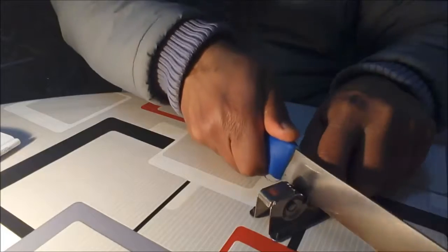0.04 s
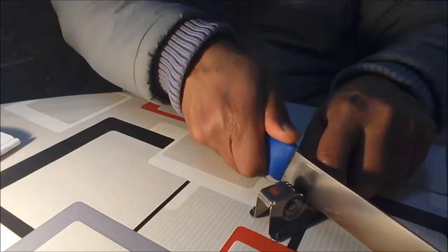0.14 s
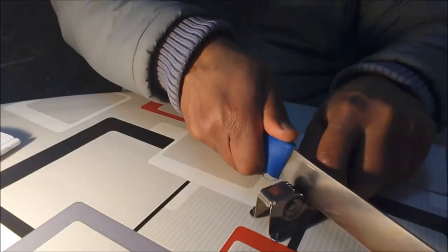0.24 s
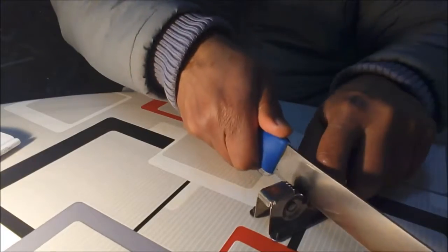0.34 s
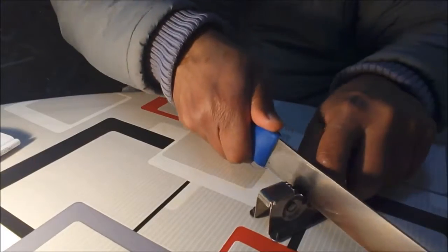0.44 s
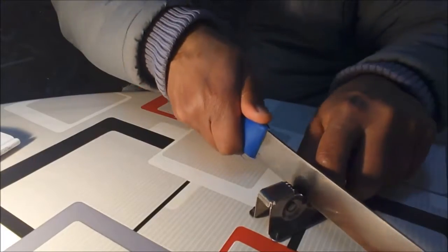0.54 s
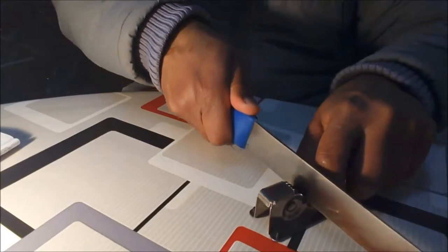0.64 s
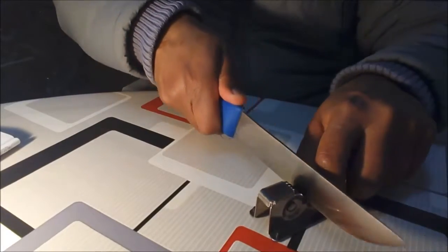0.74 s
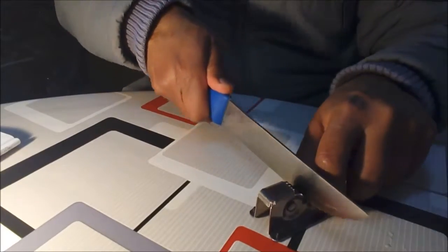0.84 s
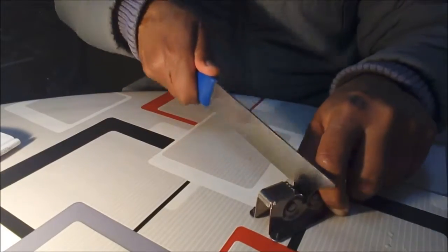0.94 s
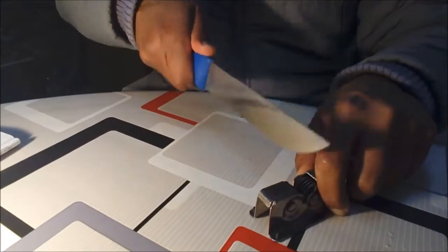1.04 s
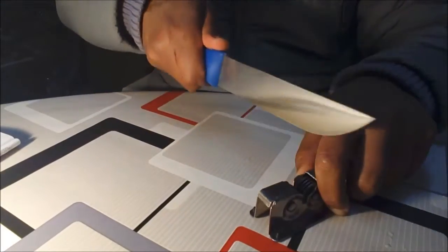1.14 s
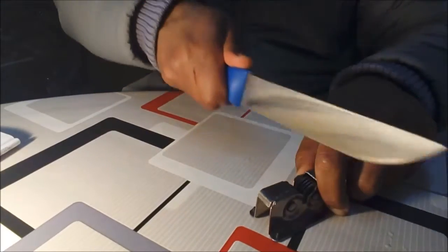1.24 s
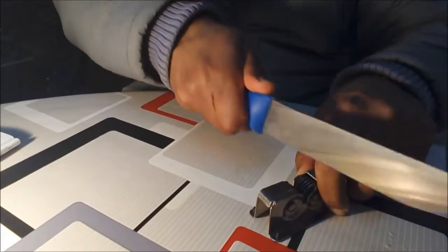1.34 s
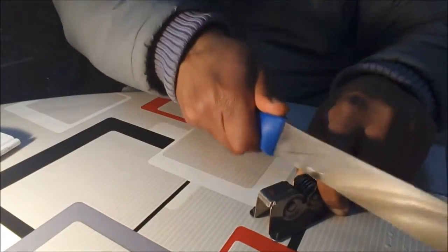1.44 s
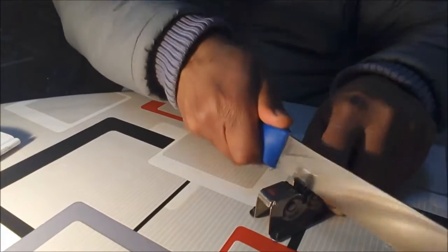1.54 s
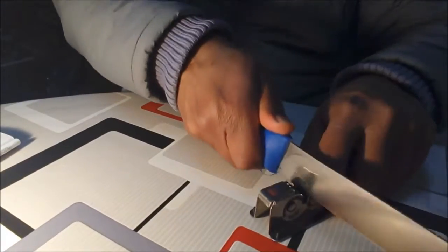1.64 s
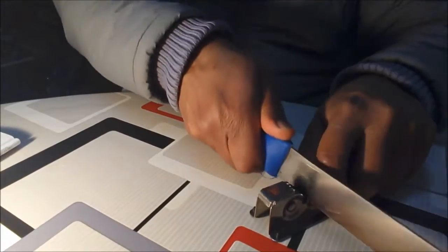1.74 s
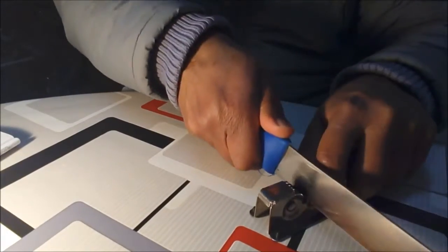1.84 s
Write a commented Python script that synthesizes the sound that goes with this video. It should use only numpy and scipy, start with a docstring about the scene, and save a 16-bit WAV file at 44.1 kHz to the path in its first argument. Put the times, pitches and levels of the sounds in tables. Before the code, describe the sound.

A kitchen knife is drawn once through a tabletop sharpener, heard close in a small room. Faint hiss until 0.2 s, then small metallic ticks and a dull thump near 0.3 s. From 0.42 s a gritty, bright steel scrape grows, the table juddering underneath, strongest around 0.7-1.05 s. Sharp clicks at 1.08-1.15 s as the tip jumps out; brief ringing fades into quiet hiss until about 1.9 s.

```python
"""A small room with a table, the camera microphone close to it: one pull of a kitchen knife through a
sharpener. Knocks thump the table top (sagging sines) and grit between the steels rings the blade (noise through
resonances). Judder shakes the table top (pulsing noise through low modes) and one blade mode sings and climbs.
The edge catches in rough bursts and ticks as it enters and as the tip jumps out (cracks and decaying sines).
The room rings on as a noise tail over a faint, steady, wide hiss."""
import sys
import numpy as np
from scipy import signal
from scipy.fft import rfft, irfft
from scipy.io import wavfile
from scipy.ndimage import uniform_filter1d

SR = 44100
rng = np.random.default_rng(int(sys.argv[2]) if len(sys.argv) > 2 else 0)


def unload_wav(signal):
    """Save mono or channel-first audio to the path in sys.argv[1] as 16-bit WAV at rate SR, clipped to [-1, 1]."""
    wavfile.write(
        sys.argv[1],
        SR,
        np.round(np.clip(np.atleast_2d(signal).T, -1, 1) * 32767).astype(np.int16),
    )


N = 83790
T = np.arange(N) / SR  # time of each sample [s]

# steady hiss of room and camera: (frequency [Hz], relative density [dB per Hz])
AIR_COLOUR = [(25, -3.5), (60, 1), (170, -6.5), (260, -17.5), (420, -12.5), (700, -10.5), (1200, -16),
              (2500, -18.5), (4000, -20), (6400, -22), (7600, -32), (10000, -35), (15400, -37)]
# stereo side of the hiss before narrowing: (frequency [Hz], side minus mid [dB])
HISS_SIDE = [(60, 0.5), (110, -7.5), (200, 8.5), (380, 2.5), (700, -4.5), (1290, -5.5), (2380, -4.5),
             (4400, -4.5), (8120, -4), (15000, -1)]
# low, middle and high groups of table-top modes, before the peaks are steepened:
# (frequency [Hz], width [Hz], relative level [dB])
TABLE_MODES = [
    [(137, 21, -8), (155.4, 16.8, 9), (169, 11, -4.5)],
    [(201.3, 53, -9), (247.8, 11.6, -1), (282.6, 26.5, -5)],
    [(336, 53, -0.5), (373.6, 6.9, -10), (406, 18, 1.5), (444, 200, -11)],
]
# deepest table modes, likewise: (frequency [Hz], width [Hz], relative level [dB])
DEEP_MODES = [(61.4, 130, -8.5), (107, 29, -0.5), (124, 71, -3)]
# rumble from judder and hands: (time [s], low modes [dB], middle modes [dB], high modes [dB])
RUMBLE_LEVELS = [(0, -78, -72.5, -75.5), (.21, -74, -74, -80.5), (0.227, -57, -44.5, -51.5),
                 (0.249, -60, -52, -52.5), (.29, -61, -52, -66), (0.324, -35.5, -44, -53),
                 (0.346, -38, -43.5, -78), (.38, -43.5, -57.5, -57), (0.426, -41, -57, -61.5),
                 (0.451, -45.5, -43.5, -51.5), (.51, -52.5, -46.5, -54.5), (.6, -51.5, -47.5, -52.5),
                 (.625, -52, -48.5, -54), (0.656, -32.5, -50, -55.5), (.682, -51, -46, -49),
                 (0.709, -36, -47, -47), (.756, -55, -44.5, -46), (.804, -42, -49.5, -42),
                 (.825, -46.5, -42.5, -48), (0.853, -39.5, -48, -40), (.878, -47.5, -41.5, -41.5),
                 (0.938, -40.5, -34, -41.5), (.965, -45, -48, -43.5), (0.989, -43, -48, -35),
                 (1.02, -49.5, -47, -46.5), (1.061, -51, -41, -42), (1.099, -48.5, -38, -38.5),
                 (1.149, -58, -44, -46.5), (1.2, -56, -53, -53.5), (1.246, -62.5, -50, -55),
                 (1.31, -75, -64, -60), (1.37, -63, -63, -75), (1.42, -63.5, -75.5, -77),
                 (1.57, -69.5, -69, -76), (1.607, -67, -79, -80), (1.625, -78, -75, -82),
                 (1.73, -84, -79, -76.5), (1.76, -65, -76, -78), (1.81, -67, -87, -83),
                 (1.85, -77, -74.5, -71), (1.9, -69, -71, -74.5)]
# deepest rumble: (time [s], level [dB])
DEEP_LEVELS = [(0.0, -79), (0.206, -80), (0.284, -62), (0.312, -38), (0.328, -37.5), (0.354, -57),
               (0.374, -50), (0.432, -42), (0.476, -52.5), (0.708, -51.5), (0.772, -56), (0.808, -45),
               (0.888, -73), (0.926, -67), (0.962, -69), (1.116, -60), (1.238, -80), (1.27, -64),
               (1.306, -71), (1.418, -65.5), (1.614, -65.5), (1.63, -72.5), (1.766, -80), (1.794, -71.5),
               (1.9, -82.5)]
# knocks into the table top: (time [s], envelope peak [dB], pitch settled on [Hz], t60 [s])
KNOCKS = [(0.2262, -40.5, 246, 0.014), (0.257, -40, 252, 0.059), (0.3095, -19.5, 114, 0.023),
          (0.3543, -35.5, 204, 0.097), (0.924, -31, 249, 0.065), (1.0936, -28.5, 260, 0.06)]
# blade mode that climbs as its free length changes: (time [s], pitch [Hz], level [dB])
SING = [(0.228, 5280, -82), (.25, 5280, -66.5), (0.273, 5280, -75), (0.3, 5280, -72), (.312, 5280, -59),
        (.35, 5290, -68), (0.401, 5300, -76), (.45, 5350, -55.5), (0.521, 5310, -56), (0.599, 5650, -68),
        (.66, 5750, -68)]
# the singing thin at rest, then blurred: (thin width [Hz], blurred width [Hz])
SING_WIDTHS_HZ = (110, 450)
# change from thin to blurred as the scrape bites: (start [s], end [s])
SING_BLURS_S = (.39, .44)
# rough low patches as the edge catches: (time [s], envelope peak [dB], centre [Hz], t60 [s])
CATCHES = [(0.4524, -54, 1375, 0.028), (0.4858, -50, 1725, 0.048), (0.5796, -53, 1890, 0.03),
           (0.6519, -51, 1870, 0.04), (0.7746, -48.5, 1750, 0.064), (0.828, -44, 1350, 0.053)]
# free ring of the blade: (frequency [Hz], level [dB], t60 when clear of the slot [s],
# loss while held in it [dB])
BLADE_MODES = [(1786, -12.5, 0.13, -3), (2920, -4, 0.098, 0), (4050, -7, 0.1, -1), (5280, -1, 0.16, 0),
               (6070, -9, 0.35, 36), (6330, 5.5, 0.057, -3.5), (7160, -1, 0.019, -13),
               (8620, -17.5, 0.13, -6), (8874, 4, 0.24, 67), (9400, -16, 0.034, -8), (9800, -20, 0.046, 3),
               (11700, -15, 0.028, -4)]
# ticks of the edge on the discs, levels before halving: (time [s], ring [dB], crack [dB],
# brightness [dB per octave], crack decay time [s], ring left [0-1], top of the crack [Hz])
TICKS = [(0.2281, -59, -48.5, -4, 0.0034, 0.77, 7500), (0.306, -49, -43, -2, 0.0038, 0.64, 8500),
         (0.355, -42, -40, 7, 0.0021, 0.2, 11500), (0.423, -72, -56, -2, 0.0033, .3, 10000),
         (1.0772, -49, -26, -2, .003, 0.6, 15100), (1.094, -50, -27.5, 0, 0.0029, 0.3, 10000),
         (1.104, -47, -29.5, -9, 0.0025, .3, 9000), (1.124, -52, -42, 3, 0.0028, 0.3, 10000),
         (1.139, -54, -41, 10, 0.0024, 1, 14500), (1.1476, -48.5, -31, 1, 0.0033, 1, 14500),
         (1.154, -49, -51, -5, 0.0014, 0.9, 14500)]
# broad colour of steel on steel: (frequency [Hz], relative density [dB per Hz])
STEEL_COLOUR = [(450, -4.5), (800, -7.5), (1300, -7), (2000, -10.5), (2800, -4.5), (4000, -7.5),
                (4900, -10), (6000, -5.5), (7400, -11.5), (8000, -20.5), (8600, -25.5), (9300, -15),
                (10800, -21), (12100, -24), (13400, -24), (14700, -24.5), (15400, -22)]
# blade and disc resonances against that colour: (frequency [Hz], width [Hz],
# heel [dB], middle [dB], tip [dB])
STEEL_MODES = [(1344, 30, -3, 7.5, -1), (1785, 67, 7, 9, -9), (2650, 220, 7, -1, 6.5),
               (2784, 260, 7.5, -1, 9), (3010, 94, 9.5, 3, 9.5), (3210, 210, 10.5, -1, 7),
               (3620, 43, 1, 3, 5), (3930, 110, 3, 6, 3.5), (4580, 39, 3, -1.5, -8), (5160, 114, -6, -1, 2),
               (5850, 210, 3, 11, 2), (6650, 250, 0, 4, 4), (6840, 120, 8, 3, 3), (7420, 140, 5, -10, 3),
               (8980, 240, 6, 10, 2.5), (9530, 150, 5, 1, 4), (9830, 100, 18, 14, 11.5),
               (11800, 85, 8, 6, 10)]
# moments when heel, middle and tip pass the discs: (heel [s], middle [s], tip [s])
PLACES_S = [0.55, 0.715, 0.97]
# edges between the five scrape bands: (frequency [Hz])
BAND_EDGES_HZ = [500, 2200, 4500, 8000, 10500, 16000]
# scrape levels over time; the top band is nearly silent at first, then comes in:
# (time [s], scrape around 3 kHz [dB], then levels against it:
# lowest band [dB], 4.5-8 kHz [dB], 8-10.5 kHz [dB], top band [dB])
SCRAPE_LEVELS = [(0.369, -74.5, 3, 3, -11, -18), (.413, -68.5, -7, -6, -19, -39),
                 (0.421, -52.5, -25, -12, -15, -45), (0.444, -54, -12, -14, -16, -45),
                 (0.478, -56, 1.5, -8, -6, -27), (.51, -50.5, -10.5, -10, -1.5, -28),
                 (.58, -48.5, -10.5, 1, -14, -14.5), (.64, -46.5, -5.5, -4, -10.5, -19),
                 (.69, -43.5, -7.5, 1.5, -12, -14), (.76, -44.5, -9.5, -0.5, -10.5, -20.5),
                 (.84, -42.5, -10, -2.5, -13, -18.5), (.91, -42.5, -8.5, -1.5, -11, -16),
                 (.99, -45.5, -7, 0.5, -9.5, -14), (1.059, -44.5, -11.5, -3, -8, -12),
                 (1.07, -53, 1, 2, -7, -15), (1.088, -56.5, 2.5, 5, -4, -17), (1.105, -51, -2, 2, -12, -19),
                 (1.13, -62, -6, 10.5, -3, -17), (1.149, -52.5, 5, 3, -12, -13),
                 (1.161, -61, -3, 4, -13, -17), (1.186, -69, -9, 11, -12, -11)]

AIR_DB = -71  # RMS of the hiss in the mid
ROOM_T60_S, ROOM_TREBLE_T60_S, ROOM_SPLIT_HZ = 0.49, 0.25, 7100
ROOM_DB = -9.5  # steel's room tail in the mid
SIDE_TABLE_DB, SIDE_STEEL_DB = -48, -23.5  # room tails of table and steel in the side
NARROW_HZ, NARROW_OVER_DB = 1210, -51.5  # the side thins above this pitch while the scrape is louder
JUDDER_DB, JUDDER_HZ = 4, 39.94  # spread and rate of the pushes before the rumble is evened
EVEN_S = 0.025  # averaging time that keeps the rumble even
KNOCK_RISE_S = 0.0019
KNOCK_SAG, KNOCK_SAG_S = 0.41526, 0.0043  # start pitch above the settled one (share), time of its fall
CATCH_WIDTH_HZ, CATCH_RISE_S = 670, 0.0042
TICK_RISE_S = 0.0008
GRIT_SPREAD_DB = 1.5  # mean of the random lift of each grain
GRIT_FLICKER_DB, GRIT_FLICKER_HZ = 1, 90.52
BAND_FLICKER_DB, BAND_FLICKER_HZ = 1.2, 32.18
TOP_HZ = 15500  # top of the camera's range


def undb(db):
    """Amplitude from decibels."""
    return 10 ** (np.asarray(db) / 20)


def unit(x):
    """Scale to an RMS of one."""
    return x / np.sqrt(np.mean(x ** 2))


def noise():
    """White noise."""
    return rng.standard_normal(N)


def fade(t, t60):
    """Exponential decay by 60 dB in t60."""
    return np.exp(-np.log(1000) * t / t60)


def shape(x, gain):
    """Filter by a gain given as a function of frequency."""
    hz = np.arange(N + 1) * SR / (2 * N) + 1
    return irfft(rfft(x, 2 * N) * gain(hz), 2 * N)[:N]


def points(table, hz):
    """Gain drawn through (frequency, dB) points on a log frequency axis."""
    p = np.array(table)
    return undb(np.interp(np.log(hz), np.log(p[:, 0]), p[:, 1]))


def modes(table, hz, floor=0.):
    """Gain of resonances over a floor, powers added."""
    power = sum(undb(2 * db) / (1 + (2 * (hz - f) / width) ** 2) for f, width, db in table)
    return np.sqrt(floor + power)


def walk(rate):
    """Random levels, each held for 1 / rate seconds and slewed to the next; spread 1."""
    hold = int(SR / rate)
    steps = np.repeat(rng.standard_normal(N // hold + 1), hold)
    return unit(uniform_filter1d(steps, hold)[:N])


def hiss():
    """Steady coloured noise, independent in mid and side."""
    mid = shape(noise(), lambda hz: points(AIR_COLOUR, hz))
    side = shape(noise(), lambda hz: points(AIR_COLOUR, hz) * points(HISS_SIDE, hz))
    gain = undb(AIR_DB) / np.sqrt(np.mean(mid ** 2))
    return gain * mid, gain * side


def room(x):
    """Reflections as a dying noise tail, shorter in the treble; each call draws a new tail."""
    full = noise()
    bass = shape(full, lambda hz: 1 / (1 + (hz / ROOM_SPLIT_HZ) ** 6))
    treble = full - bass
    tail = bass * fade(T, ROOM_T60_S) + treble * fade(T, ROOM_TREBLE_T60_S)
    tail = tail * (1 - np.exp(-T / 0.014))  # the reflections build up
    return signal.fftconvolve(x, tail / np.sqrt(np.sum(tail ** 2)))[:N]


def rumble():
    """Fitful noise pushes ring the table-top modes; each group follows its own level."""
    table, deep = np.array(RUMBLE_LEVELS), np.array(DEEP_LEVELS)
    levels = [np.interp(T, table[:, 0], table[:, k]) for k in range(1, 4)]
    levels.append(np.interp(T, deep[:, 0], deep[:, 1]))
    window, out = int(EVEN_S * SR), np.zeros(N)
    for group, db in zip(TABLE_MODES + [DEEP_MODES], levels):
        push = noise() * undb(JUDDER_DB * walk(JUDDER_HZ))
        # the power steepens the peaks; the divisor fades both ends
        body = shape(push, lambda hz: modes(group, hz) ** 1.18 / (1 + (56 / hz) ** 6 + (hz / 650) ** 6))
        slow_power = uniform_filter1d(uniform_filter1d(body ** 2, window), window)
        out += body / np.sqrt(slow_power) * undb(db)
    return out


def knocks():
    """Dull table thumps: decaying sines whose pitch sags as they die."""
    out = np.zeros(N)
    for start, db, hz, t60 in KNOCKS:
        t = np.clip(T - start, 0, None)
        env = (1 - np.exp(-t / KNOCK_RISE_S)) ** 2 * fade(t, t60)
        turns = hz * (t + KNOCK_SAG * KNOCK_SAG_S * (1 - np.exp(-t / KNOCK_SAG_S)))
        out += undb(db) * env / env.max() * np.sin(2 * np.pi * turns)
    return out


def sing():
    """One wavering blade mode: slow noise on a carrier that follows the pitch curve."""
    c = np.array(SING)
    phase = 2 * np.pi * np.cumsum(np.interp(T, c[:, 0], c[:, 1])) / SR

    def waver(width):
        return unit(shape(noise(), lambda hz: 1 / (1 + (2 * hz / width) ** 2)))

    thin, wide = (waver(w) * np.cos(phase) + waver(w) * np.sin(phase) for w in SING_WIDTHS_HZ)
    blur = np.interp(T, SING_BLURS_S, [0, np.pi / 2])  # equal-power crossfade
    level = undb(np.interp(T, c[:, 0], c[:, 2], -120, -120))
    return (thin * np.cos(blur) + wide * np.sin(blur)) * level


def catches():
    """The edge catches: short bursts of grit noise in one broad resonance."""
    out = np.zeros(N)
    for start, db, centre, t60 in CATCHES:
        t = np.clip(T - start, 0, None)
        env = (1 - np.exp(-t / CATCH_RISE_S)) * fade(t, t60)
        grit = shape(noise(), lambda hz: modes([(centre, CATCH_WIDTH_HZ, 0)], hz) ** 2)
        out += undb(db) * env / env.max() * unit(grit)
    return out


def ticks():
    """A short gritty crack and the ring of the blade, damped while it sits in the slot."""
    out, t = np.zeros(N), T[:SR // 3]
    rise = 1 - np.exp(-(t / TICK_RISE_S) ** 2)
    for start, ring_db, crack_db, tilt_db, length, free, top_hz in TICKS:
        def tilt(hz):
            return undb(tilt_db * np.log2(np.clip(hz, 500, 11000) / 6000))

        ring = np.zeros(len(t))
        for f, db, t60, held_db in BLADE_MODES:
            gain = undb(db - held_db * (1 - free)) * tilt(f)
            ring += gain * np.sin(2 * np.pi * f * t) * fade(t, t60 * free)
        grit = shape(noise(), lambda hz: tilt(hz) * points(STEEL_COLOUR, hz)
                     / (1 + (400 / hz) ** 4 + (hz / top_hz) ** 8))
        crack = unit(grit)[:len(t)] * np.exp(-t / length)
        i = int(start * SR)
        out[i:i + len(t)] += rise * (undb(ring_db) * ring + undb(crack_db) * crack) / 2
    return out


def scrape():
    """Uneven grit, a grain every sample, rings steel resonances that change from heel to tip."""
    grain_db = GRIT_SPREAD_DB * rng.exponential(size=N) + GRIT_FLICKER_DB * walk(GRIT_FLICKER_HZ)
    grit = noise() * undb(grain_db)
    resonances, levels = np.array(STEEL_MODES), np.array(SCRAPE_LEVELS)
    places = []
    for column in (2, 3, 4):  # heel, middle, tip
        local = resonances[:, [0, 1, column]]
        places.append(shape(grit, lambda hz: points(STEEL_COLOUR, hz) * modes(local, hz, floor=0.67)))
    shares = [np.interp(T, PLACES_S, row) for row in np.eye(3)]

    out = np.zeros(N)
    band_levels = (levels[:, 2], 0, levels[:, 3], levels[:, 4], levels[:, 5])
    for low_hz, high_hz, rel_db in zip(BAND_EDGES_HZ[:-1], BAND_EDGES_HZ[1:], band_levels):
        def band_pass(hz):
            return 1 / np.sqrt((1 + (low_hz / hz) ** 24) * (1 + (hz / high_hz) ** 24))

        band = sum(share * unit(shape(steel, band_pass)) for share, steel in zip(shares, places))
        db = np.interp(T, levels[:, 0], levels[:, 1] + rel_db, -120, -120)
        out += band * undb(db + BAND_FLICKER_DB * walk(BAND_FLICKER_HZ))
    return out


def narrow(side, rub):
    """Thin the upper part of the stereo side while the scrape is loud."""
    low = shape(side, lambda hz: 1 / (1 + (hz / NARROW_HZ) ** 12))
    loudness = uniform_filter1d(rub ** 2, size=2000) / undb(2 * NARROW_OVER_DB)  # power over threshold
    return low + (side - low) / (1 + loudness ** 4)


def scene():
    """Direct steel and table in the middle, room tails and hiss spread to left and right."""
    hiss_mid, hiss_side = hiss()
    table = rumble() + knocks()
    rub = scrape()
    steel = sing() + catches() + ticks() + rub
    mid = hiss_mid + undb(ROOM_DB) * room(steel) + table + steel
    side = hiss_side + undb(SIDE_TABLE_DB) * room(table) + undb(SIDE_STEEL_DB) * room(steel)
    side = narrow(side, rub)
    return np.array([mid + side, mid - side])


def record(dry):
    """The camera cuts the top with a steep low-pass."""
    return signal.sosfilt(signal.ellip(12, .3, 80, TOP_HZ, fs=SR, output="sos"), dry)


dry = scene()
out = record(dry)
unload_wav(out)
```